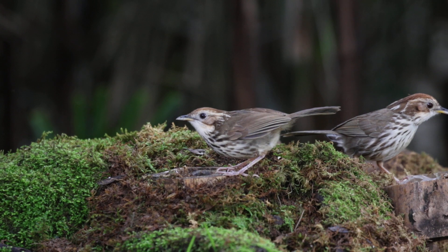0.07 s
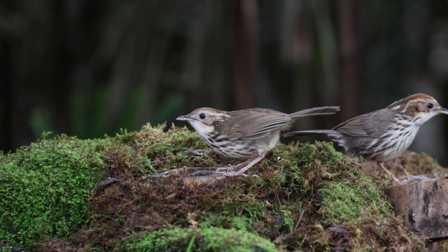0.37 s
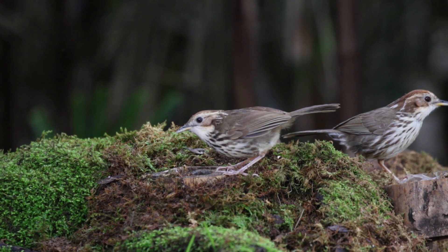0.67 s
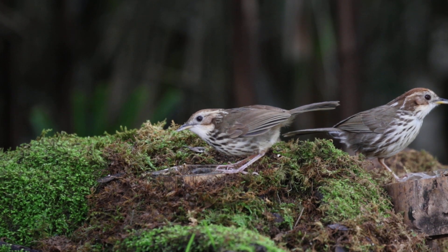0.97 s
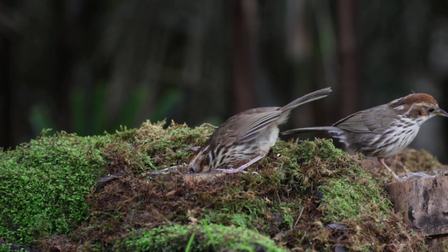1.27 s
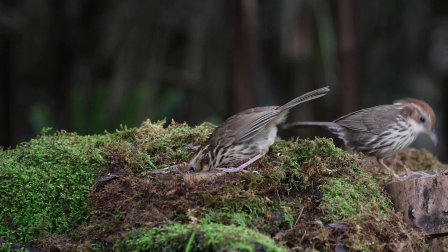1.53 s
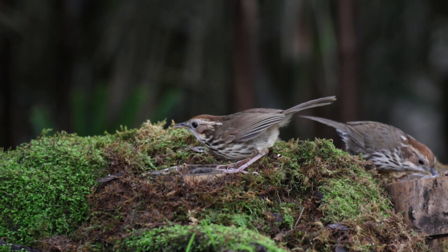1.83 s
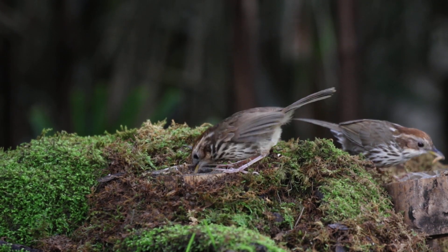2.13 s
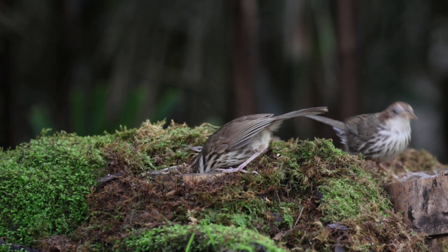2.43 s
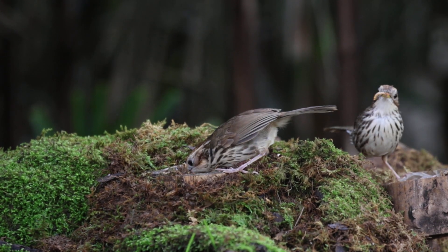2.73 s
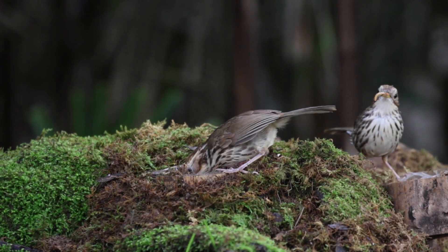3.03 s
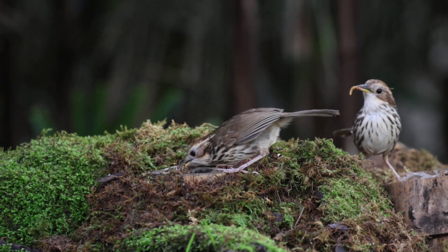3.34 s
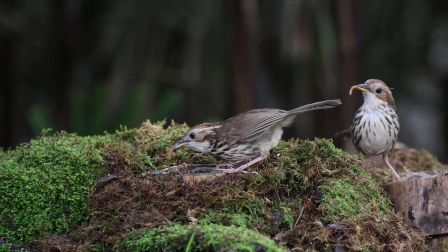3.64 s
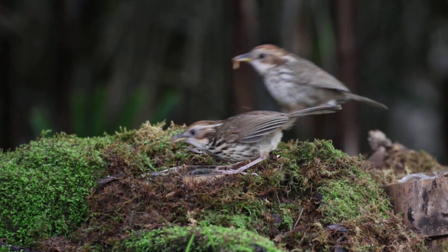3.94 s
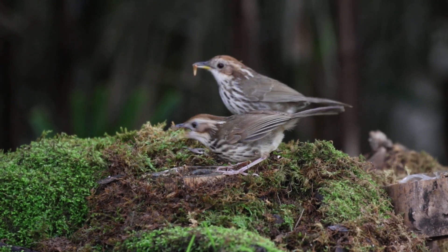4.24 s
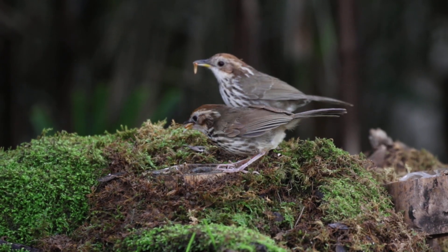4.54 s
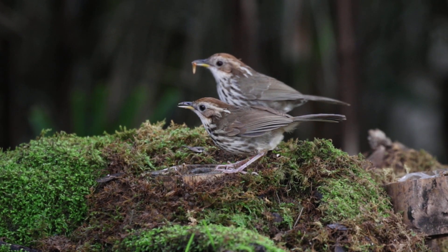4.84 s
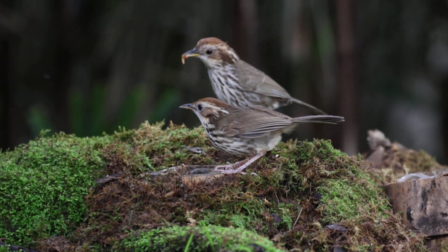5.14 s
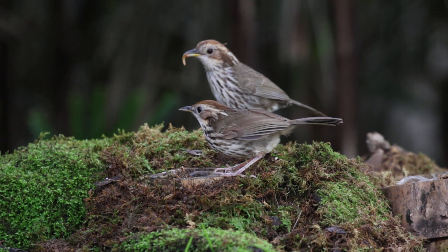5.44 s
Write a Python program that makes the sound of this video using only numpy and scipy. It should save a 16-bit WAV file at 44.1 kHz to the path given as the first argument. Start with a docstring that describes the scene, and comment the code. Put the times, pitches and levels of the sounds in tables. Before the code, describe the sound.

A small bird close to the microphone repeats a sharp, down-sweeping chirp about three times a second, with a short forest echo. Behind it are a steady insect hiss and a faint, far rumble. Other birds whistle softly among the trees, and bills and twigs click lightly. About midway, cicadas swell with a thin whine and one peck knocks on wood. The chirping continues throughout.

```python
"""A forest, one microphone feeding both channels. From the start, over a far rumble and a steady insect
hiss, a babbler on a mossy stump nearby repeats a sharp, down-sweeping chirp three times a second; ground
and trunks scatter it back. After a second, other birds whistle faintly among the trees, and bills and
twigs click as the birds feed. Around 2.4 s the cicadas swell and a whine rises with them; at 3 s one
hard peck rings the wood. The babbler calls on to the end."""
import sys
import numpy as np
from scipy import signal
from scipy.fft import rfft, irfft, next_fast_len
from scipy.io import wavfile
from scipy.ndimage import uniform_filter1d, map_coordinates

SR = 44100
rng = np.random.default_rng(int(sys.argv[2]) if len(sys.argv) > 2 else 0)


def pcm_store(signal):
    """Save signal as 16-bit PCM."""
    levels = np.round(np.clip(np.atleast_2d(signal), -1, 1) * 32767)
    wavfile.write(sys.argv[1], SR, levels.astype(np.int16).T)


N = 251370


def amp(db):
    """Decibels to gain."""
    return 10 ** (np.asarray(db) / 20)


def unit(x):
    """x at rms 1."""
    return x / np.sqrt(np.mean(x ** 2) + 1e-20)


def along(points, hz):
    """Interpolate (Hz, value) points on a log frequency axis."""
    point_hz, values = np.transpose(points)
    return np.interp(np.log(hz + 1), np.log(point_hz), values)


def wobble(rate):
    """A smooth random curve, rate knots a second."""
    return map_coordinates(rng.standard_normal(400), [np.arange(N) * rate / SR], mode="wrap")


def filtered(x, response):
    """x through a filter whose gain is response(hz)."""
    size = next_fast_len(len(x) + 8192)
    return irfft(rfft(x, size) * response(np.fft.rfftfreq(size, 1 / SR)), size)[:len(x)]


def noise(spectrum):
    """Noise of rms 1 with a (Hz, dB) spectrum."""
    return unit(filtered(rng.standard_normal(N), lambda hz: amp(along(spectrum, hz))))


def add(track, s, sound):
    """Mix a sound into the track from s seconds on."""
    start = int(round(s * SR))
    sound = sound[max(0, -start):]
    part = track[max(0, start):][:len(sound)]
    part += sound[:len(part)]


def tone(hz):
    """A sine that follows a pitch curve."""
    return np.sin(2 * np.pi * np.cumsum(hz) / SR)


def background(rumble_db=-52.5, rush_db=-47, peak_s=3.86, ease_db_per_s=1.1):
    """A low far rumble under the forest's soft rush, which builds to a peak and eases off."""
    # Each row, in both spectra: frequency in Hz, relative level in dB.
    rumble_spectrum = [(20, -31), (32, -22), (42, -21), (58, -1), (90, -8), (125, 0.5), (165, 1.5),
                       (200, -2), (235, -0.5), (330, -8.5), (400, -8), (520, -23), (800, -36)]
    rush_spectrum = [(300, -4), (480, -3.5), (680, 1.5), (900, -6.5), (1500, -8.5), (2300, -9.5),
                     (2950, -5.5), (3500, -12.5), (5000, -4.5), (8000, -39)]
    rumble = amp(rumble_db + 0.75 * wobble(5.03)) * noise(rumble_spectrum)
    rush = amp(rush_db - ease_db_per_s * np.abs(np.arange(N) / SR - peak_s)) * noise(rush_spectrum)
    return rumble + rush


def drones(fade_s, waver):
    """Low tones fade in, climb slowly and fade out, like an engine far away."""
    # Each row: start and end in seconds, start and end pitch in Hz, level in dB.
    glides = [(-.5, 2.8, 43.5, 61.5, -60.5), (2.1, 3.5, 114, 129.2, -56.5), (2.9, 5.6, 360, 378, -61.5),
              (3.9, 6.2, 228.4, 239.6, -61.5)]
    out = np.zeros(N)
    t = np.arange(N) / SR
    for start, end, start_hz, end_hz, db in glides:
        fade = np.clip(np.minimum(t - start, end - t) / fade_s, 0, 1)
        hz = np.interp(t, [start, end], [start_hz, end_hz]) * (1 + waver * wobble(3))
        out += amp(db) * fade * tone(hz)
    return out


def chorus(modes):
    """Many insects blur into noise within their shared resonances; rms 1."""
    def shape(hz):
        return sum(amp(db) / (1 + ((hz - centre) / width) ** 2) ** 2 for centre, width, db in modes)
    return unit(filtered(rng.standard_normal(N), shape))


def insects(swell_s=2.4, rise_s=0.3):
    """Cicadas swell and a whine grows out of them; crickets and smaller insects hiss steadily above."""
    # Each row, in both sets of resonances: centre in Hz, width in Hz, relative level in dB.
    cicada_modes = [(3930, 170, -7), (4265, 270, -6.5), (4640, 120, -12), (4960, 46, -0.5), (5207, 125, -2),
                    (5488, 120, -0.5), (5827, 193, -3), (6070, 93, -8.5)]
    cricket_modes = [(7470, 59, 0.5), (7580, 53, -4), (9300, 230, -12.5), (9900, 71, -7.5),
                     (10590, 280, -7.5), (10960, 99, -10)]
    # Each row: frequency in Hz, relative level in dB.
    hiss_spectrum = [(3000, -47), (6000, -8.5), (6700, -9.5), (7200, -4), (7650, 2), (8200, -3),
                     (8900, -10), (9600, -6), (10700, -12.5), (11350, -11), (11900, -21.5), (12600, -25),
                     (13700, -24), (14500, -32), (15800, -31)]
    swell = .5 + .5 * np.tanh((np.arange(N) / SR - swell_s) / rise_s)
    cicadas = amp(-48.5 + 4.5 * swell + 0.56 * wobble(12)) * chorus(cicada_modes)
    # one cicada nearer the microphone holds a wavering tone above the blur of the others
    near_cicada = tone(4288 + 16 * wobble(60))
    whine = amp(-57.5 + 8.5 * swell) * (near_cicada + 0.39 * chorus([(4260, 70, 0)]))
    hiss = amp(-47 + 0.26 * wobble(15)) * noise(hiss_spectrum)
    crickets = amp(-56.5 + 0.72 * wobble(6.04)) * chorus(cricket_modes)
    return cicadas + whine + hiss + crickets


def scatter(t60_scale):
    """The diffuse answer of leaves and trunks, of energy 1 and even over frequency."""
    # Each row: frequency in Hz, seconds to die by 60 dB (t60) before scaling.
    forest_decay = [(500, 0.24), (2500, 0.42), (6000, 0.33), (12000, 0.17)]
    hz, t, frames = signal.stft(rng.standard_normal(SR // 2), SR, nperseg=256)
    t60 = t60_scale * along(forest_decay, hz)[:, None]
    tail = signal.istft(frames * amp(-60 * t / t60), SR, nperseg=256)[1]
    spectrum = rfft(tail)
    colour = np.sqrt(np.abs(uniform_filter1d(np.abs(spectrum) ** 2, size=300)) + 1e-12)
    return irfft(spectrum / colour)


def other_birds(direct_db, wet_db, rasp):
    """Soft falling whistles from farther off among the trees; the short ones are raspy."""
    # Each row: start and length in seconds, start and end pitch in Hz, relative level in dB.
    whistles = [(1.09, 0.13, 3600, 3060, -59), (2.115, 0.15, 3590, 3230, -53),
                (2.476, 0.028, 2600, 2080, -43), (2.492, 0.042, 1950, 1604, -51),
                (2.524, 0.02, 2416, 2255, -40.5), (2.656, 0.06, 2705, 2484, -39.5),
                (2.722, 0.14, 2650, 2550, -55), (3.296, 0.065, 2150, 1600, -52),
                (3.365, 0.035, 2530, 2120, -48), (3.804, 0.05, 2210, 1700, -49.5),
                (3.814, 0.054, 2640, 2220, -53.5), (4.95, 0.037, 7700, 6900, -50),
                (4.977, .06, 2350, 1675, -55), (5.039, 0.057, 2490, 2235, -52)]
    out = np.zeros(N)
    for s, length, start_hz, end_hz, db in whistles:
        progress = np.linspace(0, 1, int(length * SR))
        flutter = map_coordinates(rng.standard_normal(100), [progress * length * 500], mode="wrap")
        hz = start_hz * (end_hz / start_hz) ** progress * (1 + rasp * flutter * (length < .1))
        note = amp(db) * np.abs(np.sin(np.pi * progress)) ** .5 * tone(hz)
        add(out, s, amp(direct_db) * note)
        add(out, s, amp(wet_db) * signal.fftconvolve(note, scatter(0.57)))
    return out


def rustle(peak_s=1.545, half_length_s=0.036, level_db=-45.5):
    """A soft, brief rustle as a bird probes the moss."""
    # Each row: frequency in Hz, relative level in dB.
    moss_spectrum = [(1200, -21), (2500, -5), (3700, -1), (4600, -3), (7000, -27)]
    t = np.arange(N) / SR
    return amp(level_db) * np.exp(-((t - peak_s) / half_length_s) ** 2) * noise(moss_spectrum)


def clicks(level_db, dull_hz):
    """Bill snaps, pecks and twigs: each contact is a fast-dying burst of noise in its own band."""
    # Each row: start in seconds, relative level in dB, centre in Hz, width in octaves, t60 in seconds.
    contacts = [(1.417, -36, 1200, 2, 0.017), (1.751, -47, 12000, .1, .015), (1.817, -47, 12000, .1, .015),
                (1.884, -47, 12000, .1, .015), (1.915, -35, 1960, 0.44, 0.027),
                (2.073, -21, 8700, 0.31, .006), (2.075, -32, 1800, 1.8, 0.017),
                (2.256, -18, 11000, 0.43, 0.0083), (2.258, -30.5, 10000, 0.43, 0.085),
                (2.258, -33, 1300, 1.9, 0.034), (3.0362, -24, 1600, 1.0, 0.024),
                (3.092, -31, 4500, 1.1, .03), (4.234, -18, 8700, 0.069, 0.0034),
                (4.234, -27, 12100, 0.12, .005), (4.2333, -27.5, 2210, 0.49, 0.015),
                (4.553, -34.5, 1690, 1.9, 0.11)]
    out = np.zeros(N)
    t = np.arange(-SR // 100, SR // 10) / SR
    for s, db, centre_hz, octaves, t60 in contacts:
        def band(hz):
            bell = np.exp(-.5 * (np.log2((hz + 1) / centre_hz) / octaves) ** 2)
            return bell / (1 + (hz / dull_hz) ** 10)
        decay = (t >= 0) * amp(-60 * np.abs(t) / t60)
        burst = filtered(rng.standard_normal(len(t)) * decay, band)
        add(out, s + t[0], amp(db + level_db) * unit(burst) * np.sqrt(np.mean(decay ** 2)))
    return out


def knock(start_s=3.0365, level_db=-34.5):
    """One hard peck reaches the wood and rings it briefly."""
    # Each row: frequency in Hz, relative level in dB, t60 in seconds.
    wood_modes = [(644, -4, 0.051), (1100, -6, .055), (1340, -1, .05), (1825, -2, .039), (3343, -3, .03)]
    out = np.zeros(N)
    t = np.arange(SR // 10) / SR
    ring = sum(amp(level_db + db - 60 * t / t60) * np.sin(2 * np.pi * hz * t)
               for hz, db, t60 in wood_modes)
    add(out, start_s, ring)
    return out


def surroundings(near_db, near_scale, forest_db):
    """From perch to microphone: the direct path, distinct echoes, and scatter from stump and trees."""
    # Nearby ground and trunks. Each row: delay in milliseconds, level in dB against the direct path.
    echoes = [(6, -6), (14, -14), (26, -19.5), (35, -14), (45, -12.5)]
    path = amp(near_db) * scatter(near_scale) + amp(forest_db) * scatter(0.45)
    path[0] += 1
    for ms, db in echoes:
        add(path, ms / 1000, amp([db]))
    return path


def chirp(age, start_hz, ledge_hz, opening_db):
    """A pure whistle plunges an octave (at age 0), drifts down a ledge, gives a last push and sags."""
    # Pushes on the opening, on reaching the ledge and on letting go.
    # Each row: age in seconds, half-length in seconds, boost in dB.
    accents = [(-.009, 0.0028, 5.5), (.0055, 0.0038, 7.5), (.031, 0.0028, 11.5)]
    plunge_s, drift_hz_per_s = 0.00292, 5500
    let_go_s, sag_hz, sag_s = .030, 1081, .018
    lead_s, attack_db_per_s, hold_db, release_db_per_s = 0.009, 1400, -5, 447
    opening = .5 - .5 * np.tanh(age / plunge_s / 2)  # share of the high opening in the note
    released = np.maximum(age - let_go_s, 0)
    sag = sag_hz * (1 - np.exp(-released / sag_s))
    low_hz = ledge_hz - drift_hz_per_s * np.minimum(age, let_go_s) - sag
    hz = opening * start_hz + (1 - opening) * low_hz
    db = hold_db - attack_db_per_s * np.maximum(-lead_s - age, 0) - release_db_per_s * released
    db += sum(boost_db * np.exp(-((age - s) / width) ** 2) for s, width, boost_db in accents)
    return signal.windows.tukey(len(age), .1) * amp(db + opening * opening_db) * tone(hz)


def babbler(level_db, pitch_spread, pace_spread, shifting_db, far_db):
    """The bird on the nearby stump repeats one chirp, slightly varied; the forest scatters it back."""
    # Each row: time of mid-plunge in seconds, opening pitch in Hz, relative level in dB.
    calls = [(0.013, 6190, -35), (0.342, 6300, -36), (0.6699, 6200, -35), (0.9907, 6110, -34),
             (1.3175, 6300, -34), (1.64, 6220, -33.5), (1.9693, 6220, -33), (2.286, 6160, -33),
             (2.6037, 6200, -33.5), (2.9281, 6240, -34.5), (3.2532, 6270, -36), (3.5931, 6220, -35),
             (3.9178, 6170, -34.5), (4.2506, 6210, -35), (4.5794, 6180, -34), (4.901, 6200, -33.5),
             (5.227, 6200, -34), (5.5527, 6220, -33.5)]
    # The high opening is beamed away from the microphone, so it scatters more.
    # Each row: frequency in Hz, relative scatter level in dB.
    beam = [(2000, 3.5), (3000, -3.5), (5400, 11), (6150, 5.5)]
    out = np.zeros(N)
    t = np.arange(-SR // 32, SR // 11) / SR
    perch = surroundings(near_db=-10, near_scale=0.066, forest_db=-9.5)
    for (s, start_hz, db), (detune, pace) in zip(calls, rng.standard_normal((len(calls), 2))):
        age = t * np.exp(pace_spread * pace)
        ledge_hz = 3080 * (1 + pitch_spread * detune)
        note = chirp(age, start_hz, ledge_hz, opening_db=-1 + 0.85 * s)  # the opening grows call by call
        # the bird stays on its perch, so only part of the scatter changes as its head turns
        shifting = filtered(scatter(0.94), lambda hz: amp(shifting_db + along(beam, hz)))
        path = perch + shifting + amp(far_db) * scatter(4.6)
        add(out, s + t[0], amp(db + level_db) * signal.fftconvolve(note, path))
    return out


def scene():
    """The forest from one microphone near the stump, the same in both channels."""
    near = babbler(level_db=3.0, pitch_spread=0.00645, pace_spread=0.02, shifting_db=-3.5, far_db=-12)
    far = other_birds(direct_db=2.5, wet_db=3.0, rasp=0.02)
    feeding = clicks(level_db=-3, dull_hz=13200) + knock() + rustle()
    mono = near + far + feeding + insects() + background() + drones(fade_s=0.41, waver=0.00367)
    return np.array([mono, mono])


def record(dry):
    """The recorder keeps nothing above its band limit."""
    top_hz = 15850
    return np.array([filtered(channel, lambda hz: hz < top_hz) for channel in dry])


dry = scene()
out = record(dry)
pcm_store(out)
```